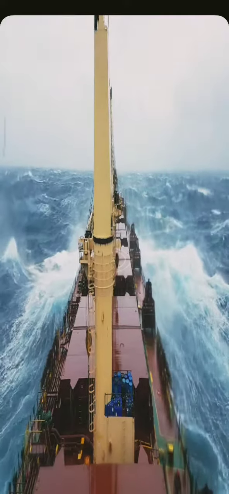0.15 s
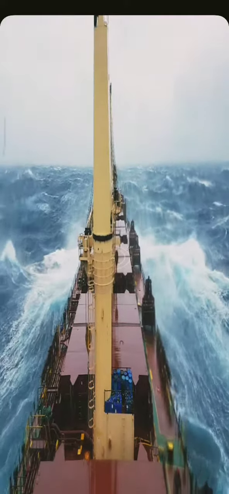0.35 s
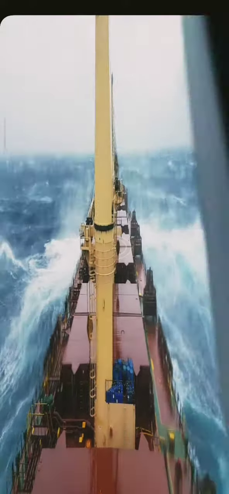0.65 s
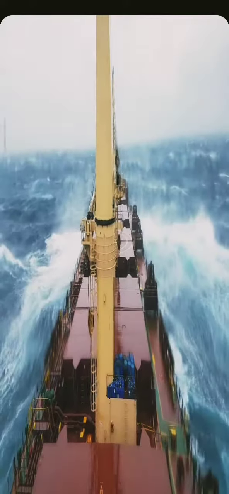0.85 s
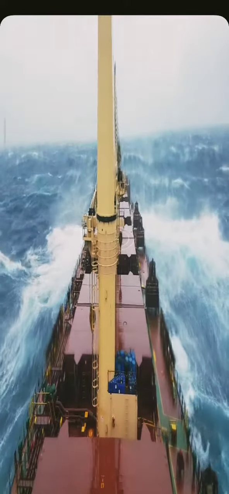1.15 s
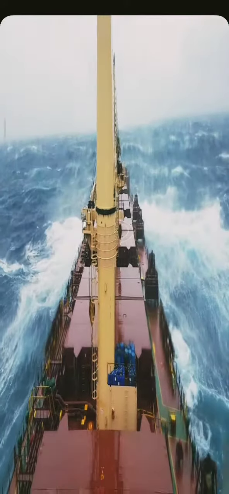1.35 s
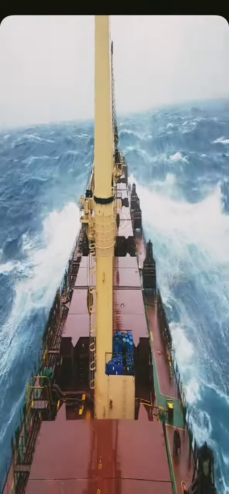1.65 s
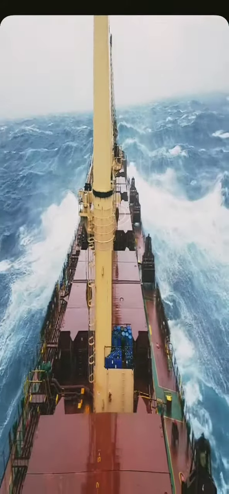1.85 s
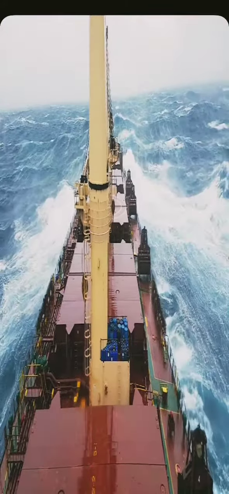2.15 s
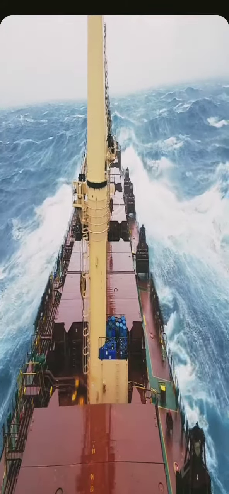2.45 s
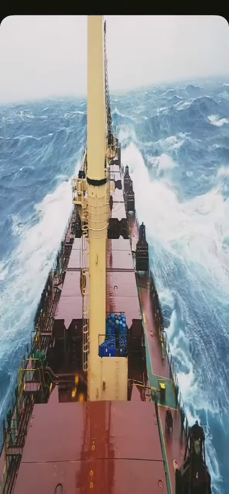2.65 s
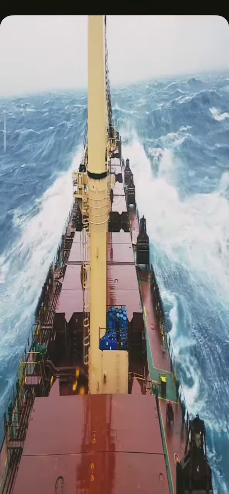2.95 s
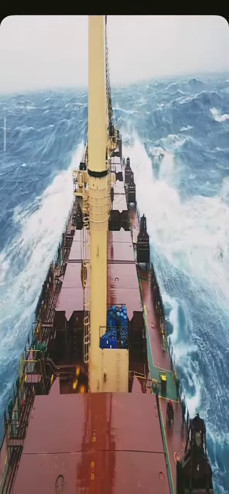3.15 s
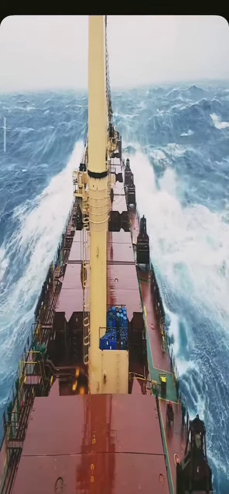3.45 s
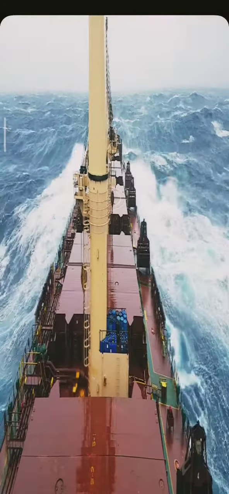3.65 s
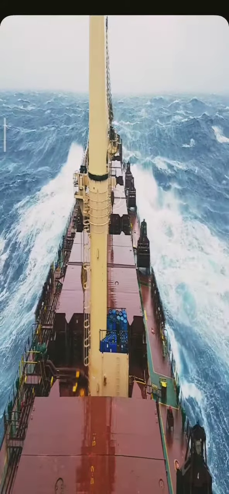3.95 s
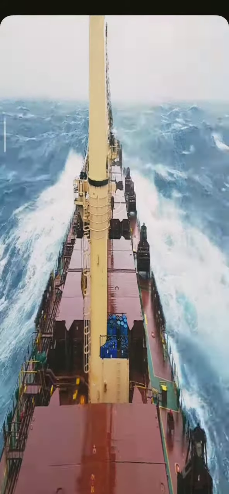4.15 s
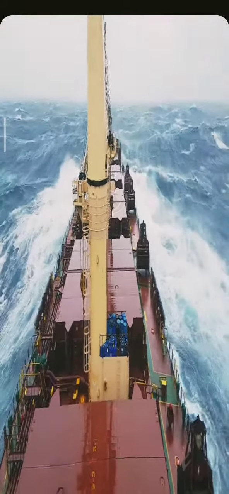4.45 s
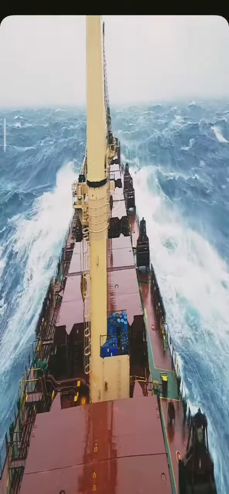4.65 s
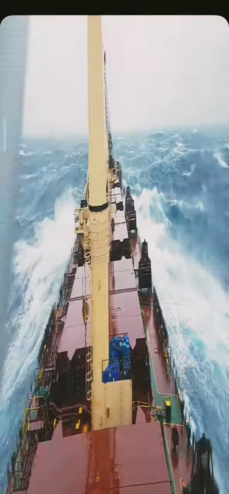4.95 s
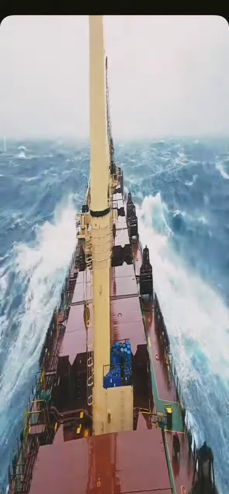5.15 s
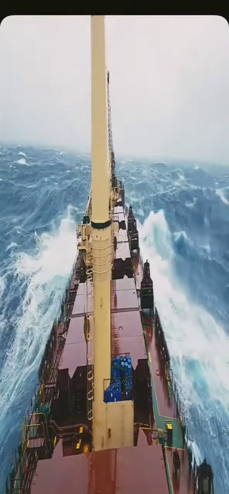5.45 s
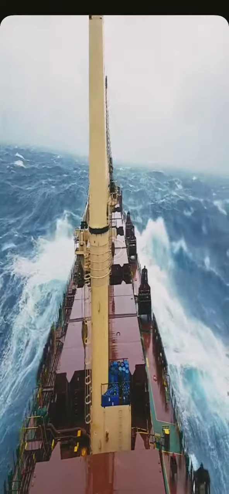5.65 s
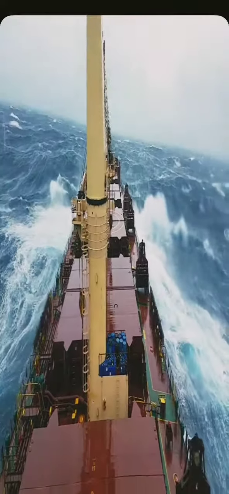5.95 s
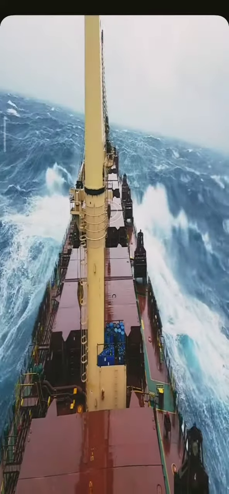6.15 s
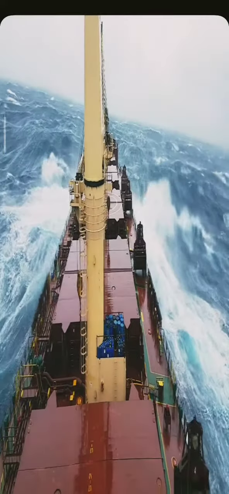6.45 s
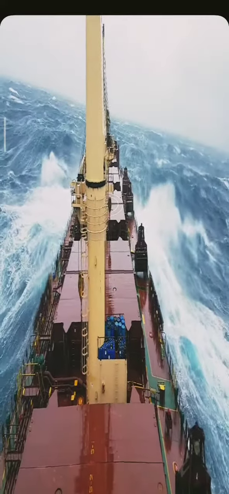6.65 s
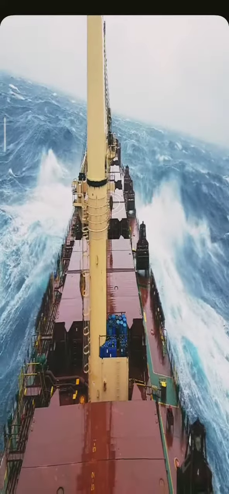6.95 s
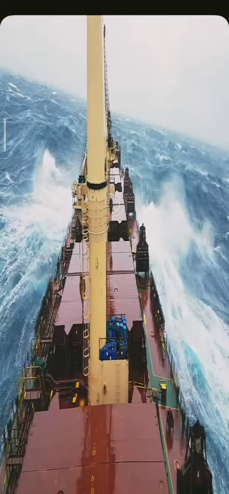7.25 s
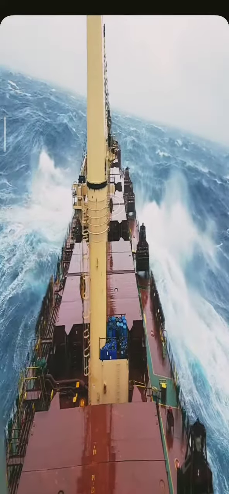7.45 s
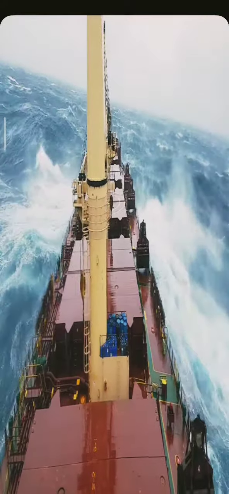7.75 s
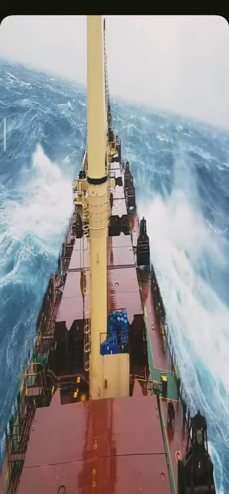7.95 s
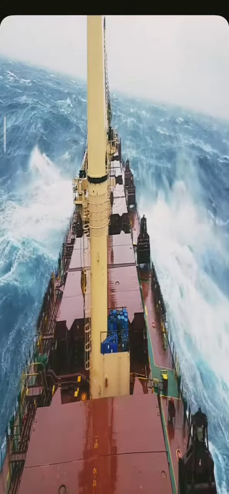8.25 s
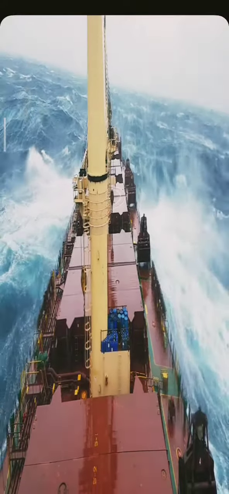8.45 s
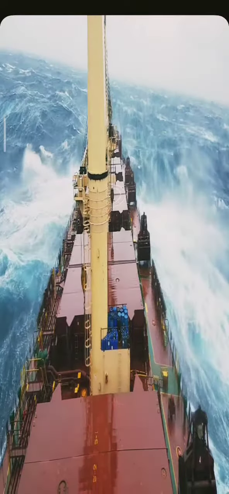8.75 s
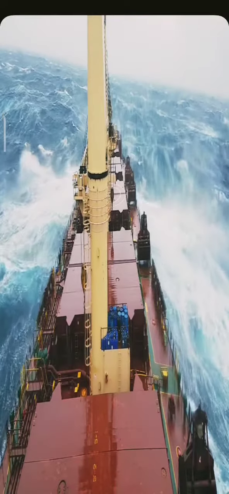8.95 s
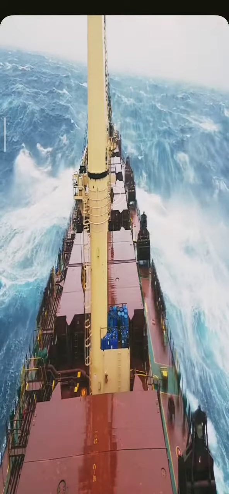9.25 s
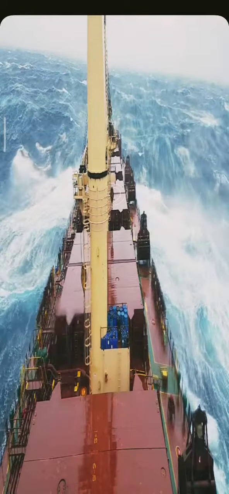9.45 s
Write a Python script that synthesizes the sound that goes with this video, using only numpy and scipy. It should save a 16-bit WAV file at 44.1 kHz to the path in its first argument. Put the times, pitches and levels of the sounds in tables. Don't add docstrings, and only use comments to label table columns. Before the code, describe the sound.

Muffled sea rush and deep engine drone in a rolling ship, with moaning gusts, a humming panel, ticking latch, sharp knocks and a metal clink.

```python
import sys
import numpy as np
from scipy import signal
from scipy.io import wavfile
from scipy.ndimage import uniform_filter1d

SR = 44100
rng = np.random.default_rng(int(sys.argv[2]) if len(sys.argv) > 2 else 0)


def generate_wav(sig):
    pcm = np.round(np.clip(np.atleast_2d(sig).T, -1, 1) * 32767).astype(np.int16)
    wavfile.write(sys.argv[1], SR, pcm)


def decibels_to_gain(level_db):
    exponent = np.asarray(level_db, float) / 20
    return 10 ** exponent


N = 422917

# start_s, level_db
WEATHER = [(0, -90), (.48, -76.5), (1.49, -81), (1.76, -77.5), (2.91, -83), (3.74, -88.5), (4.97, -99),
           (5.31, -83.5), (6.41, -85.5), (7.18, -81.5), (8.2, -76.5), (8.6, -85.5), (9.0, -78.5),
           (9.59, -85)]
# start_s, level_db
STRAIN = [(0, -73), (.82, -64), (1.28, -78), (2.43, -84), (3.9, -75.5), (4.51, -65.5), (5.3, -63.5),
          (7.0, -59.5), (7.58, -60), (8.1, -53), (8.6, -59.5), (9.2, -58), (9.59, -65)]


def in_time(rows):
    s, *columns = np.transpose(rows)
    return [np.interp(np.arange(N) / SR, s, c) for c in columns]


def bouts(rows, rest_db, rise, fall):
    t = np.arange(0, N, 40) / SR
    s, hold, db = np.array(rows)[:, :3].T[:, :, None]
    climb = rise * np.maximum(s - t, 0)
    decay = fall * np.maximum(t - s - hold, 0)
    level = db - climb - decay
    return np.interp(np.arange(N) / SR, t, np.maximum(level.max(axis=0), rest_db))


def rms_one(x):
    return x / np.sqrt(np.mean(x ** 2) + 1e-20)


def drift(rate):
    r = np.exp(-80 * np.pi * rate / SR)
    slow = signal.lfilter([1], [1, -2 * r, r * r], rng.standard_normal(N // 40 + 2002))[2000:]
    return np.interp(np.arange(N) / 40, np.arange(len(slow)), rms_one(slow))


def clicks_at(rows):
    out = np.zeros(N)
    for s, db, *_ in rows:
        out[round(s * SR)] = decibels_to_gain(db)
    return out


def ring(clicks, hz, t60):
    r, w = decibels_to_gain(-60 / (t60 * SR)), 2 * np.pi * hz / SR
    return signal.lfilter([0, np.sin(w)], [1, -2 * r * np.cos(w), r * r], clicks + 1e-18)


def strike(clicks, modes):
    return sum(decibels_to_gain(db) * ring(clicks, hz, t60) for hz, db, t60 in modes)


def twice(x, hz, width):
    r = np.exp(-np.pi * width / SR)
    stage = [(1 - r * r) / 2, 0, (r * r - 1) / 2, 1, -2 * r * np.cos(2 * np.pi * hz / SR), r * r]
    return signal.sosfilt([stage, stage], x)


def hollow(hz, width):
    return rms_one(twice(rng.standard_normal(N + SR), hz, width)[SR:])


def banded(spectrum, patchy_db, lift_db=0, lift_hz=2000):
    hz_at, db_at = np.transpose(spectrum)
    thirds = round(3 * np.log2(hz_at[-1] / hz_at[0]))
    edges = np.geomspace(hz_at[0], hz_at[-1], thirds + 1)
    white, together, out = rng.standard_normal((2, N + SR)), drift(3.7), 0
    for k, (low, high) in enumerate(zip(edges, edges[1:])):
        hz = np.sqrt(low * high)
        sos = signal.butter(2, [low, high], "band", fs=SR, output="sos")
        band = signal.sosfilt(sos, white[k % 2])[SR:]
        near = np.exp(-(np.log2(hz / lift_hz) / 0.23) ** 2)
        level_db = np.interp(np.log(hz), np.log(hz_at), db_at) + near * lift_db
        flicker_db = patchy_db * (0.8 * together + drift(18.0))
        out = out + band * decibels_to_gain(level_db + flicker_db)
    return rms_one(out)


def generator():
    # multiple, level_db
    generator_tones = [(3, -57.5), (4, -59), (5, -63)]
    generator_hz = 168.4
    turns = np.cumsum(generator_hz + 1.1 * drift(3)) / SR
    return sum(decibels_to_gain(db + 2 + 3.0 * drift(2.4)) * np.sin(2 * np.pi * round(k) * turns) for k, db in generator_tones)


def engine():
    # pitch_hz, level_db (per Hz)
    rumble_spectrum = [(12, -41.5), (20, -17), (64, -7.5), (97, -1.5), (123, 1), (171, 1), (206, -7.5),
                       (248, -19), (400, -13), (520, -41.5), (880, -120)]
    # start_s, level_db
    load = [(0, -32.5), (.5, -36.5), (1.5, -33), (2.9, -40.5), (4.9, -34.5), (5.3, -44), (5.75, -31.5),
            (6.3, -42), (8.2, -40.5), (8.55, -35), (9.1, -39.5), (9.59, -31.5)]
    # pitch_hz,
    # width_hz, level_db
    hull_modes = [(36.3, 29, -44.5), (92, 27, -39.5), (209.5, 16, -42.5), (313.4, 13, -50),
                  (346.3, 29, -48), (506.7, 12, -53), (604.5, 14, -58), (677.4, 47, -51), (732, 17, -58),
                  (842, 48, -60)]
    load_db, = in_time(load)
    rumble = decibels_to_gain(load_db) * banded(rumble_spectrum, patchy_db=2.0)
    return rumble + sum(decibels_to_gain(db) * hollow(hz, width) for hz, width, db in hull_modes)


def sea_rush():
    # pitch_hz, level_db (per Hz)
    rush_spectrum = [(200, -29.5), (280, -2.5), (364, -14.5), (500, -9), (700, -17.5), (800, -18),
                     (1580, -26), (1900, -36.5), (2600, -34.5), (3800, -51), (5000, -69), (7000, -71)]
    shuts_s, takes_s, open_db, shut_db = 4, 0.93, 3.5, -4.5
    strain_db, = in_time(STRAIN)
    seal_db, = in_time([(shuts_s - takes_s, open_db), (shuts_s + takes_s, shut_db)])
    level_db = -39 + 0.063 * (strain_db - strain_db.mean())
    return decibels_to_gain(level_db) * banded(rush_spectrum, patchy_db=0.82, lift_db=seal_db)


def drops():
    per_s, level_db, t60_s = 18, 3, .06
    hits = (rng.random(N) < per_s / SR) * decibels_to_gain(level_db + rng.normal(0, 3, N))
    return signal.lfilter([1], [1, -decibels_to_gain(-60 / (t60_s * SR))], hits + 1e-18)


def splashes():
    # start_s, drops_db, mist_db, t60_s
    sheets = [(0.1268, -78, -74, 0.5), (0.4238, -68.5, -76, 0.14), (0.7736, -64, -74, 0.15),
              (0.8798, -56, -70.5, 0.13), (0.9394, -53, -78, 0.14), (1.0834, -63, -71, 0.11),
              (1.253, -57, -78.5, 0.16), (1.4167, -55, -67.5, 0.035), (1.434, -77, -67, 0.03),
              (1.5593, -67, -75.5, 0.27), (1.6627, -60, -72, 0.1), (1.783, -59, -78.5, 0.12),
              (1.9712, -62, -74.5, 0.14), (2.0386, -56, -64, 0.15), (2.2164, -66, -69, 0.087),
              (2.2586, -60, -67.5, 0.13), (2.7296, -69, -73, 0.16), (3.7805, -62, -71.5, 0.11),
              (4.124, -66, -77, 0.12), (4.2323, -61, -71.5, 0.073), (4.793, -76, -73.5, 0.1),
              (5.2056, -56, -63.5, 0.092), (5.3156, -64, -84, 0.2), (6.278, -57.5, -77.5, 0.17),
              (6.8844, -62, -78, 0.18), (7.07, -54, -78, 0.099), (7.1596, -55, -72.5, 0.1),
              (7.2434, -61, -80.5, 0.13), (8.054, -61, -74, 0.14), (9.5446, -61.5, -73.5, 0.3)]
    out = np.zeros((2, N + SR))
    for s, heavy_db, fine_db, t60 in sheets:
        t = np.arange(int(t60 * SR)) / SR
        shape = (1 - np.exp(-t / .0025)) * decibels_to_gain(-60 * t / t60)
        out[:, round(s * SR):][:, :len(t)] += shape * decibels_to_gain(np.array([[heavy_db], [fine_db]]))
    return out[:, :N]


def spray_on_glass():
    # pitch_hz, level_db (per Hz)
    spray_spectrum = [(2000, -9), (3200, -0.5), (4200, -3.5), (5200, -7), (7000, -10), (10000, -13)]
    # pitch_hz, level_db (per Hz)
    mist_spectrum = [(7500, -3.5), (9500, -3.5), (13000, -1.5), (17500, -1.5)]
    # pitch_hz, level_db (per Hz)
    wash_spectrum = [(900, -8), (1500, -2), (2600, -2.5), (4000, -9.5)]
    glass_cut_hz, mist_db, wash_db, wash_smear_s = 8800, -90.5, 4.5, .03
    spray_db, = in_time(WEATHER)
    patter = decibels_to_gain(2.2 * drift(45) - 1) + drops()
    heavy, fine = splashes()

    spray = (decibels_to_gain(spray_db + 5) * patter + decibels_to_gain(-5) * heavy) * banded(spray_spectrum, patchy_db=1.2)
    spray = signal.sosfilt(signal.butter(8, glass_cut_hz, fs=SR, output="sos"), spray)

    mist_level = decibels_to_gain(mist_db) * np.sqrt(patter) + decibels_to_gain(-91.5) + decibels_to_gain(-1.5) * fine
    mist = mist_level * banded(mist_spectrum, patchy_db=2.5)

    keep = np.exp(-1 / (wash_smear_s * SR))
    thuds = signal.lfilter([1 - keep], [1, -keep], heavy)
    wash = decibels_to_gain(wash_db) * thuds * banded(wash_spectrum, patchy_db=0.5)
    return spray + mist + wash


def trim():
    # pitch_hz, width_hz
    trim_bands = [(2520, 340), (3780, 220)]
    (strain_db,), (spray_db,) = in_time(STRAIN), in_time(WEATHER)
    levels = strain_db - 4.5, -78 + 0.45 * (spray_db - spray_db.mean())
    return sum(decibels_to_gain(db + 2.5 * drift(35)) * hollow(hz, width) for (hz, width), db in zip(trim_bands, levels))


def latch():
    # start_s, peak_db
    ticks = [(1.9218, -61), (2.1012, -58), (2.146, -61.5), (2.2136, -57.5), (2.2376, -58.5), (2.264, -64),
             (2.3738, -56), (2.5635, -63), (2.7765, -70), (3.1285, -61), (3.1854, -56.5), (3.2712, -58.5),
             (3.3348, -57), (3.4094, -55.5), (3.4423, -61), (3.474, -57.5), (3.5012, -55.5), (3.5516, -57),
             (3.6551, -53.5), (3.7195, -53.5), (3.7718, -51.5), (3.8025, -56), (3.8339, -53.5),
             (3.869, -57)]
    # pitch_hz, level_db, t60_s
    latch_modes = [(3780, 2, 0.019), (7800, -14, .01), (8400, -18, .01)]
    return strike(clicks_at(ticks), latch_modes)


def clink():
    # start_s, level_db
    bounces = [
        (5.203, -59),
        (5.229, -77),
        (5.267, -84),
        (5.29, -79),
        (5.318, -80),
    ]
    # pitch_hz, level_db, t60_s
    metal_modes = [(4340, 2, .09), (5050, -3, .2), (5940, -3, .24), (8890, -4, .22), (10950, -9, .18),
                   (12700, -10, .07), (13700, -6, .09), (15070, -12, .13)]
    out, start, length = np.zeros(N), round(bounces[0][0] * SR), SR // 2
    hits = signal.lfilter([.02], [1, -.98], clicks_at(bounces)[start:start + length] / .02)
    for hz, db, t60 in metal_modes:
        rough = rms_one(twice(rng.standard_normal(length), hz, 170))
        decay = signal.lfilter([1], [1, -decibels_to_gain(-60 / (t60 * SR))], hits)
        out[start:start + length] += decibels_to_gain(db - 34) * rough * decay
    return out


def snaps():
    # start_s, peak_db, body_hz, t60_s, top_hz
    snap_events = [
        (0.6355, -11.5, 1640, 0.0026, 2880),
        (5.357, -23.5, 1555, 0.017, 3150),
        (9.3038, -31.5, 2410, 0.0026, 17120),
    ]
    out = np.zeros(N)
    for s, db, hz, t60, top_hz in snap_events:
        click = clicks_at([(s, db)]) + 1e-18
        edge = signal.sosfilt(signal.butter(2, 800, "high", fs=SR, output="sos"), click)
        soft = signal.butter(10, min(top_hz, 19000), fs=SR, output="sos")
        out += signal.sosfilt(soft, 2.0 * edge - ring(click, hz, t60)) + decibels_to_gain(-34) * edge
    return out


def panel():
    # start_s, hold_s, level_db, pitch_hz
    hum_bouts = [(0.299, .08, -30.5, 122), (.62, .53, -31.5, 121.6), (1.874, .15, -32.5, 124.5),
                 (2.203, .1, -30.5, 124.9), (2.371, .1, -25.5, 119.4), (2.545, .05, -28.5, 119.8),
                 (2.704, .2, -26, 121), (2.95, .7, -33.5, 120.7), (4.003, .28, -27.5, 121.3),
                 (4.292, .33, -30, 120.5), (4.752, .27, -33, 121), (5.077, .05, -34, 119),
                 (5.275, .25, -31.5, 121.6), (6.101, .83, -26, 120.4), (7.0, .13, -24, 121.3),
                 (7.254, .55, -26.5, 120.6), (7.843, .5, -24, 120.1), (8.35, .45, -25, 120.6),
                 (8.857, .42, -23, 120.6)]
    # start_s, hold_s, level_db
    buzz_bouts = [(4.12, .05, -77), (4.23, .02, -78), (4.31, .17, -79), (4.54, .06, -77),
                  (6.12, .07, -77.5), (6.28, 0.18, -77.5), (6.51, .11, -75.5), (6.76, .19, -76),
                  (7.03, 0.1, -76), (7.29, 0.068, -72.5), (7.46, .08, -80), (7.6, .16, -75.5),
                  (7.79, 0.12, -74), (7.99, .53, -72.5), (8.56, .15, -78.5), (8.76, 0.053, -74.5),
                  (8.85, 0.45, -73), (9.27, .03, -77)]
    # pitch_hz, level_db, width_hz
    frame_modes = [(2500, 12, 300), (3920, -10, 150), (4650, -14, 200), (5970, 4, 340), (6860, -14, 250),
                   (8500, -9, 500), (9390, -14, 300), (10300, -11, 600), (11650, -10, 600),
                   (12800, -15, 500), (15200, -18, 700)]
    slack_db, missed_db = -64, -14
    hz, = in_time([(s + hold / 2, hz) for s, hold, _, hz in hum_bouts])
    hum_db = bouts(hum_bouts, -41, rise=150, fall=107)
    turns = np.cumsum(hz + .7 * drift(8)) / SR
    hum = np.sqrt(2) * decibels_to_gain(hum_db + 1.5 * drift(15)) * np.sin(2 * np.pi * turns)

    slaps = np.diff(np.floor(turns + .1 + .03 * drift(60)), prepend=0).clip(0, 1)
    slaps = slaps * decibels_to_gain(1.5 * drift(25) + rng.normal(0, 2.2, N))
    odd_turn = np.floor(turns) % 2
    slaps = slaps * decibels_to_gain(missed_db * odd_turn * (in_time(STRAIN)[0] < slack_db))
    contact = signal.lfilter([1], [1, -np.exp(-1 / (0.00077 * SR))], slaps)
    chatter = slaps + .15 * contact * rng.standard_normal(N)
    buzz = sum(decibels_to_gain(db) * twice(chatter, hz, width) for hz, db, width in frame_modes)
    buzz_db = bouts(buzz_bouts, -110, rise=696.5, fall=501.5) + 5.5
    return hum + decibels_to_gain(buzz_db) * rms_one(buzz)


def howl():
    # pitch_hz, width_hz
    cavities = [(151, 6.7), (187, 11), (236, 16.1), (262, 13)]
    # start_s, hold_s, level_db
    gust_bouts = [
        [(.29, 0.059, -30.5), (1.29, 0.093, -27.5), (2.96, 0.1, -33.5), (4.42, 0.22, -36), (5.77, .3, -33)],
        [(.24, .1, -33.5), (1.0, 0.23, -35.5), (1.74, 0.35, -36.5), (3.12, 0.39, -29.5), (3.68, 0.096, -30),
         (3.94, 0.055, -30.5), (4.19, 0.33, -30.5), (4.75, 0.28, -30), (5.22, .35, -29.5), (5.7, .5, -36.5),
         (7.63, .05, -32), (9.2, .39, -39.5)],
        [(.15, 0.14, -25.5), (.45, 0.37, -24.5), (1.0, 0.25, -27.5), (1.3, 0.86, -27.5), (2.4, 0.21, -26),
         (4.08, 0.099, -32), (5.3, 0.3, -35.5), (6.05, 0.41, -30.5), (6.62, 0.46, -29.5), (7.23, 0.37, -27.5),
         (7.76, 0.18, -29.5), (8.79, 0.58, -32), (9.52, 0.064, -27.5)],
        [(.06, 0.049, -27.5), (.47, 0.43, -27), (.9, 0.1, -27.5), (1.25, 0.35, -28.5), (1.74, 0.46, -32),
         (2.65, 0.061, -36), (5.79, 0.13, -32), (6.26, .34, -30), (6.76, .1, -30), (9.22, 0.069, -31)],
    ]
    rest_levels = [-42.5, -41, -40, -43.5]
    out = 0
    for (hz, width), gusts, rest_db in zip(cavities, gust_bouts, rest_levels):
        note = hollow(hz, width)
        swell = np.sqrt(uniform_filter1d(note ** 2, size=3500) + 0.1)
        out = out + decibels_to_gain(bouts(gusts, rest_db, rise=139.5, fall=112.5)) * note / swell
    return out


def scene():
    background = generator() + engine() + sea_rush() + spray_on_glass()
    fittings = trim() + latch() + clink() + snaps()
    return (background + fittings + panel() + howl())[None]


def roll_off(x):
    return signal.sosfilt(signal.butter(12, 15750, fs=SR, output="sos"), x)


def record(dry):
    return roll_off(dry)


dry = scene()
out = record(dry)
generate_wav(out)
```